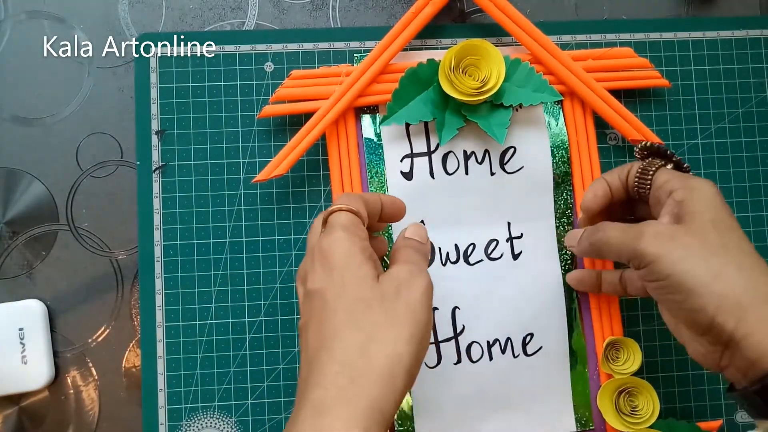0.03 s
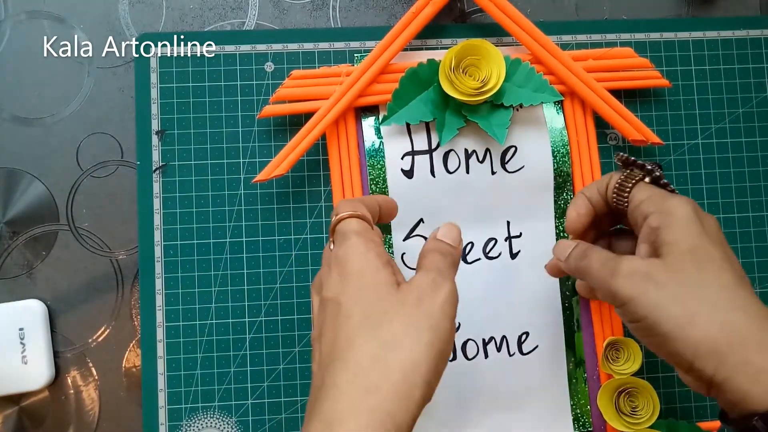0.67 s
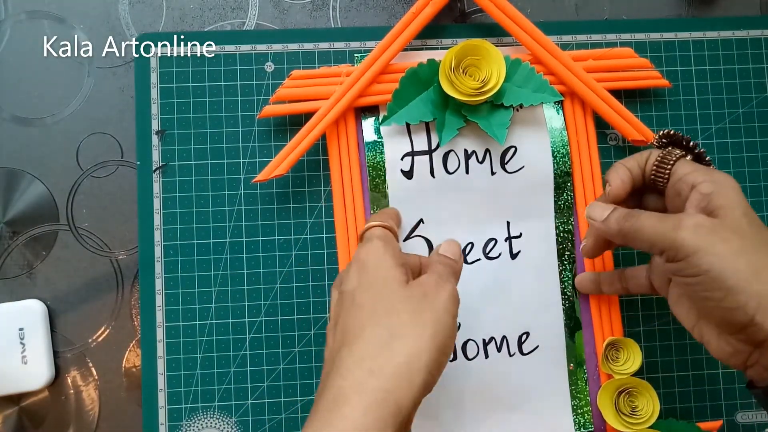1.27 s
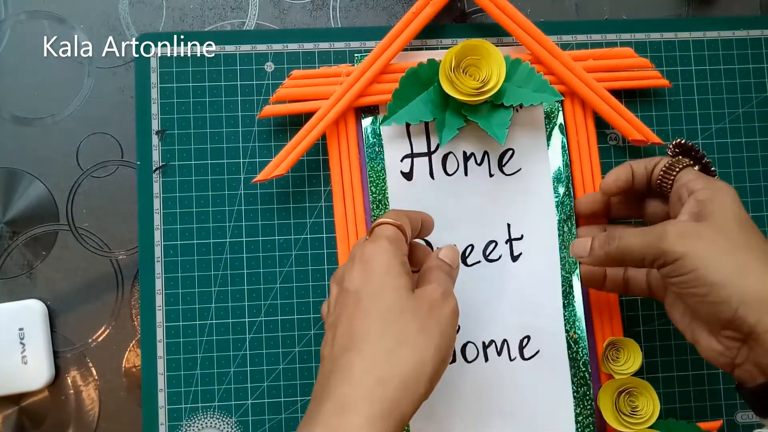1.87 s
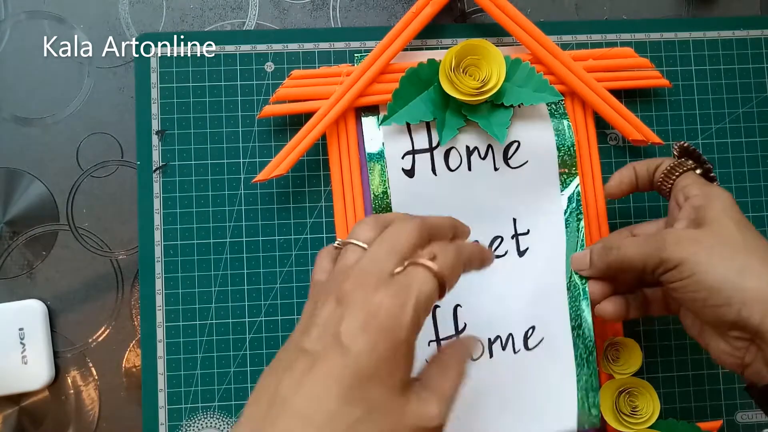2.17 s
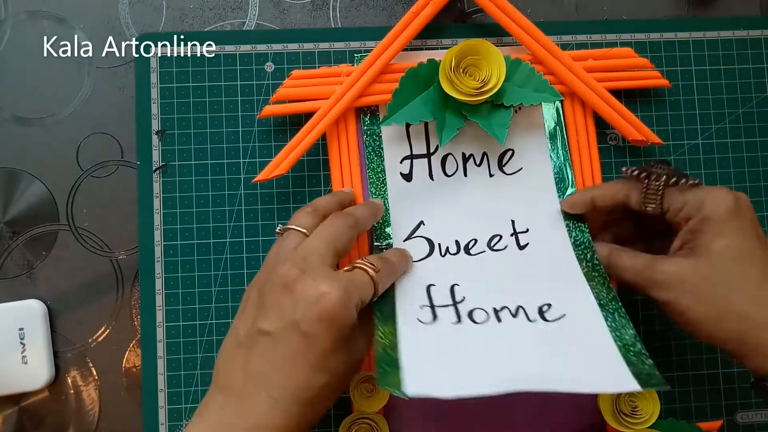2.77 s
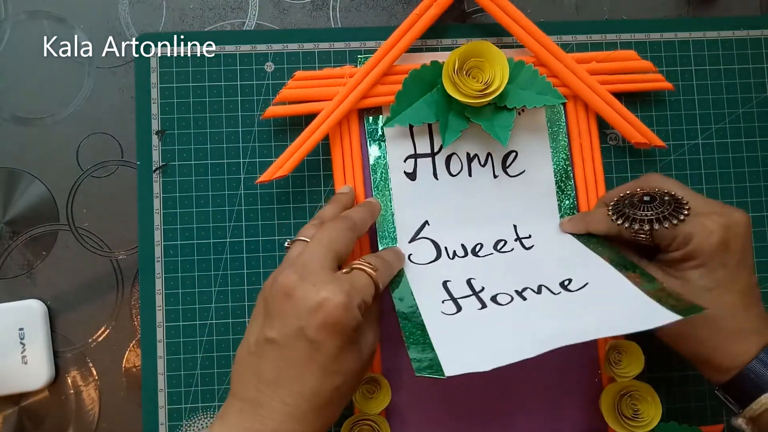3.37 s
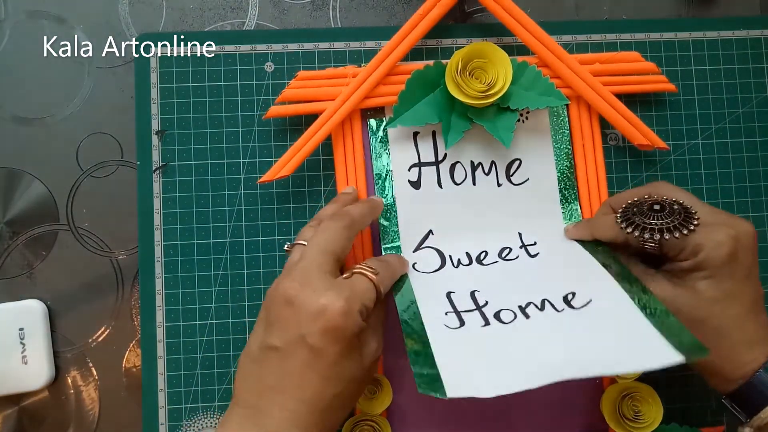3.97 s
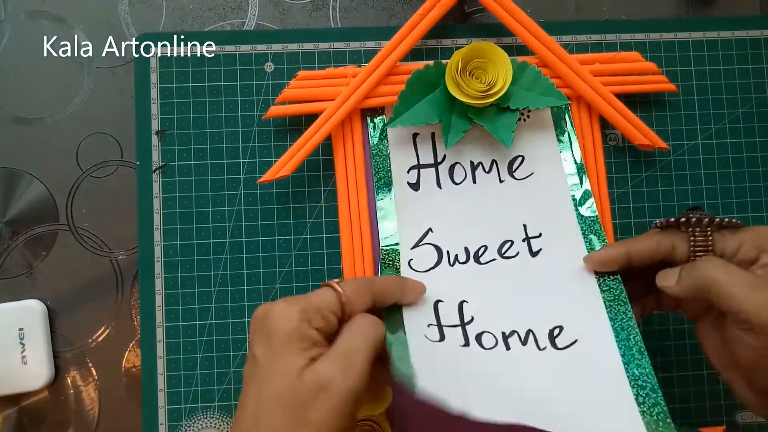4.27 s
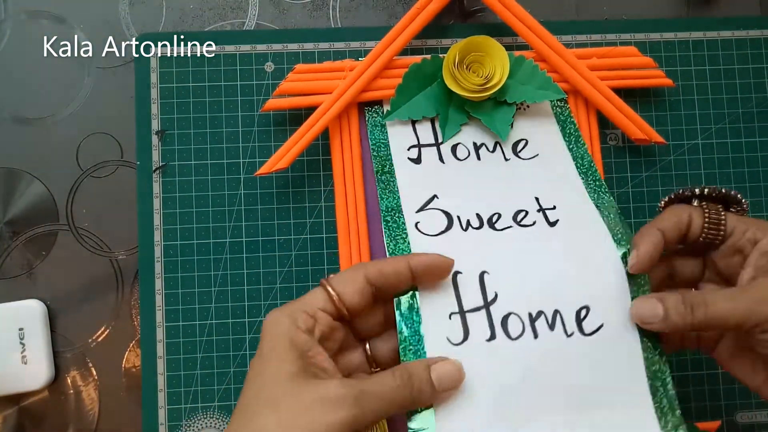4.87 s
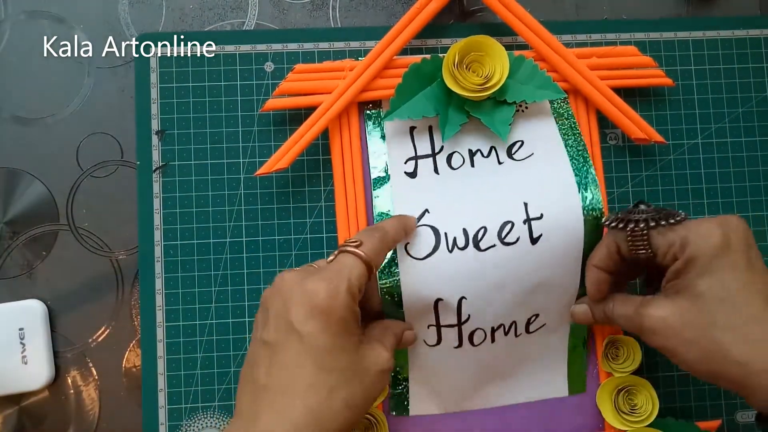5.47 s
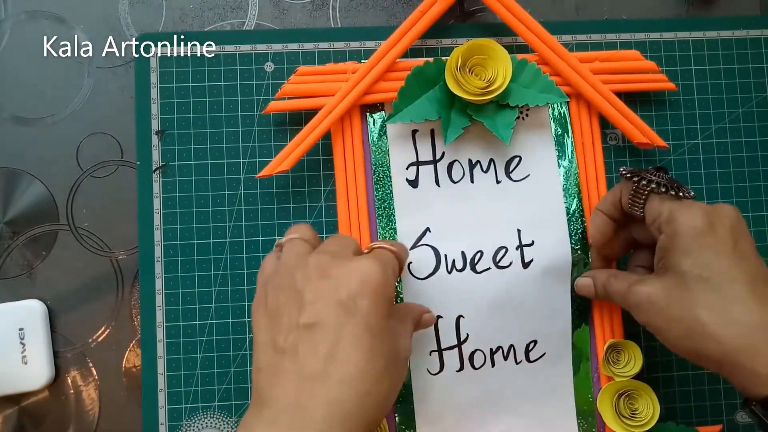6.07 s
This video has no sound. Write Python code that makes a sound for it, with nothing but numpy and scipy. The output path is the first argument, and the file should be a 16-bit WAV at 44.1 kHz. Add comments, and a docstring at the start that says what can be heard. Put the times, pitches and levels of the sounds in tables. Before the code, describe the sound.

A foil-backed card crinkles and snaps as it is worked into a paper frame, with soft, low bumps from the table.

```python
"""A foil-backed paper card snaps and crackles as two hands slide it into a paper frame, close by.
It snaps where it buckles, and crackles as its fibres catch and slip on the frame and fingers.
The hands lean on the craft table, which booms softly. A small, hard room answers every snap,
over quiet air and a faint whine."""
import sys
import numpy as np
from scipy import signal
from scipy.fft import rfft, irfft
from scipy.io import wavfile
from scipy.ndimage import uniform_filter1d, minimum_filter1d

SR = 44100
rng = np.random.default_rng(int(sys.argv[2]) if len(sys.argv) > 2 else 0)


def to_wav(sig):
    """Store sig (one row per channel, or 1-D mono) as 16-bit WAV at the path in sys.argv[1].

    Samples outside -1..1 are clipped; the rate is SR.
    """
    pcm = np.clip(np.atleast_2d(sig), -1, 1) * 32767
    pcm = np.round(pcm).astype(np.int16)
    wavfile.write(sys.argv[1], SR, pcm.T)  # frames by channels


N = 274346
TIME = np.arange(N) / SR

# Each time the card buckles (a larger patch has a lower lowest ring):
# time_s, level_db, crumple_s, lowest_ring_hz, strongest_ring_hz, brightness_db_per_octave
SNAPS = [(0.0341, -41.5, .0016, 1900, 1990, 0.5), (0.144, -32.5, 0.0083, 2170, 2020, -5.5),
         (0.1755, -20.5, 0.0014, 1900, 1870, -8), (0.187, -27.5, 0.0011, 2130, 3800, -2),
         (0.1904, -32, 0.0021, 2040, 2500, -14), (0.4441, -43.5, .0013, 1700, 1580, -4.5),
         (0.7045, -53, 0.0088, 2000, 3800, 5), (1.251, -40, 0.0018, 260, 2200, 16),
         (1.3583, -43, .0006, 5340, 6600, 4), (1.5655, -48, 0.0045, 1660, 2560, 3.5),
         (1.6934, -24, 0.00078, 1950, 3180, -2), (1.735, -18, 0.0021, 1700, 3700, 5),
         (2.047, -29, 0.011, 530, 3670, 7), (2.0538, -21, 0.014, 490, 4800, 7),
         (2.0825, -23.5, 0.0026, 435, 3200, -0.5), (2.0898, -32, 0.00028, 476, 3750, 14),
         (2.1788, -36, 0.0009, 580, 3300, 4), (2.2655, -48.5, .004, 440, 850, -18),
         (2.3542, -35.5, 0.0038, 556, 750, -22), (2.413, -32.5, 0.0044, 650, 2000, -3),
         (2.42, -32.5, 0.0033, 357, 2140, 8), (2.557, -35.5, 0.006, 485, 3320, 10),
         (2.7519, -42, 0.012, 260, 1630, -8.5), (3.216, -57, 0.003, 1110, 1900, -7.5),
         (3.3672, -52.5, 0.0004, 1300, 1920, -4), (3.4075, -31.5, .0021, 1390, 1750, 6.5),
         (3.5489, -36.5, 0.00069, 1660, 1940, -3.5), (3.5762, -36.5, 0.011, 700, 3450, -1),
         (3.6054, -46, .0008, 830, 1940, -12), (3.709, -39.5, .0007, 980, 2050, -10.5),
         (3.7751, -37.5, 0.0056, 1660, 1950, -24), (3.8842, -44.5, 0.02, 875, 1930, -22),
         (3.9371, -40, 0.00077, 377, 2060, -7.5), (3.9723, -35.5, .0033, 814, 1440, -9),
         (3.987, -36, 0.00058, 490, 2960, 5), (4.1746, -32, 0.0052, 463, 1250, -25),
         (4.2315, -37.5, 0.0086, 1710, 2730, 3), (4.327, -28, 0.0066, 510, 1090, -9.5),
         (4.394, -31, 0.001, 460, 533, -34), (4.4214, -28, 0.00068, 397, 2900, -6.5),
         (4.527, -25, 0.0049, 490, 3860, 7), (4.5374, -30.5, 0.0011, 456, 1400, -15.5),
         (4.668, -41, 0.002, 463, 1340, -13), (4.678, -31.5, 0.0032, 500, 1060, -17),
         (4.7613, -22.5, 0.0016, 322, 1140, -5.5), (4.7878, -21.5, 0.0054, 520, 726, -11),
         (4.8052, -21.5, 0.0036, 515, 2600, -9), (4.8239, -31, 0.0022, 444, 990, -7),
         (4.9461, -22.5, 0.0012, 494, 1232, -11), (4.993, -36, 0.0038, 410, 594, -17),
         (5.025, -42.5, .0045, 426, 575, -14), (5.1307, -23, 0.0025, 1120, 1380, -6.5),
         (5.143, -29.5, 0.0072, 328, 940, -3.5), (5.195, -31, 0.0068, 633, 1030, -24),
         (5.3014, -34, 0.0028, 804, 980, -24), (5.357, -33.5, 0.0066, 720, 1060, -3),
         (5.3628, -32.5, 0.0043, 815, 1120, -27), (5.4666, -37.5, 0.0034, 900, 1550, -5),
         (6.1456, -41.5, 0.0016, 1680, 1480, -6.5), (6.172, -29.5, 0.0013, 1270, 3860, -15.5),
         (6.1762, -25.5, 0.0035, 1030, 2770, -6.5), (6.2134, -33.5, 0.0047, 1700, 2780, -14)]


def snap(level_db, crumple_s, low_hz, ring_hz, bright_db, creases_per_s=4500, pop=0.34,
         ring_db=9.5, flutter=0.79, flutter_s=0.023, damping_hz=7000):
    """Tiny creases build to a pop and die away; the patch rings and ripples cross the card."""
    size, pop_at = 4096, 256  # samples
    t, hz = np.arange(size) / SR, np.fft.rfftfreq(size, 1 / SR)
    since_pop = t - pop_at / SR
    sizes = amp(6 * np.minimum(rng.exponential(1, size), 3)) * rng.choice([-1, 1], size)
    rise_and_fall = np.exp(np.minimum(since_pop / 0.65, -since_pop) / (0.99 * crumple_s))
    crumple = sizes * (rng.random(size) < creases_per_s / SR) * rise_and_fall
    crumple /= np.linalg.norm(crumple) + 1e-9
    crumple[pop_at] += pop * 0.0025 / crumple_s  # a short crumple is nearly all one pop
    ripples = rng.standard_normal((2, size)) * amp(-60 * t / flutter_s)
    ripples = left_and_right(*rfft(ripples / np.linalg.norm(ripples[0])), hz)
    lag_s = np.array([[0], [rng.normal(0.5, 1) * 0.00007]])  # each snap lies in a different spot
    paths = np.exp(-2j * np.pi * hz * lag_s) + flutter * ripples / np.hypot(1, hz / damping_hz)
    resonance = amp(ring_db / (1 + ((hz / ring_hz - 1) / 0.089) ** 2))
    sound = irfft(rfft(crumple) * paths * ringing(card_tone(hz, low_hz, bright_db) * resonance))
    # gives its start relative to the pop, and the sound with its level counted over 9 ms
    return since_pop[0], amp(level_db) * unit(sound) * np.sqrt(0.009 * SR / size)


def buckling():
    """The bending card gives way, one snap at a time."""
    out = np.zeros((2, N))
    for time_s, *settings in SNAPS:
        offset_s, sound = snap(*settings)
        add(out, time_s + offset_s, sound)
    return out


def card_tone(hz, low_hz, bright_db):
    """A patch of card gives out little below its lowest ring; quick foil slips lift the treble."""
    # The card's own tone: pitch_hz, level_db
    tone = [(150, -25.5), (290, 1.5), (450, -1), (680, -6.5), (1000, -2.5), (1560, -1.5), (2000, -2.5),
            (3750, -1), (4420, -3.5), (5200, -13), (6600, -12), (8400, -19.5), (12000, -32), (14500, -33)]
    below = (low_hz / (hz + 1)) ** 2
    bass_cut = np.sqrt(1 / (1 + below ** 4) + 0.0045 / (1 + below))
    treble_octaves = np.log2(np.hypot(1, np.minimum(hz, 8000) / 2000))
    return bass_cut * amp(look_up(tone, hz) + bright_db * treble_octaves)


def hand_movement(held_db=-71.5, held_low_hz=1730, held_bright_db=8.5,
                  creak_db=-27, creak_s=0.036, settle_s=0.0033):
    """Level, lowest ring and brightness of the rubbing over time; louder moves shape the tone more."""
    # The card rubs on frame and fingers:
    # start_s, length_s, level_db, swell_db, lowest_ring_hz, brightness_db_per_octave
    strokes = [(0.043, 0.027, -51.5, -7, 1720, -2), (0.091, 0.11, -50.5, -9, 1740, -7),
               (0.178, 0.034, -36, -8, 505, 0.5), (0.27, 0.24, -54.5, 3.5, 1660, -2.5),
               (0.666, 0.058, -53, 19, 1670, 2.5), (0.79, 0.019, -67, 31, 1720, -22),
               (0.944, 0.14, -51.5, -16, 2010, 6), (1.061, 0.12, -47.5, 2.5, 1990, 1),
               (1.209, 0.075, -52, -4, 1430, -2), (1.443, 0.12, -54.5, 8.5, 1940, 3),
               (1.718, 0.081, -39.5, -11, 490, -1), (1.805, 0.19, -49.5, 2, 434, 6.5),
               (1.916, .065, -40.5, -9, 1620, 0.5), (1.988, 0.12, -38, 17.5, 567, 2.5),
               (2.121, 0.15, -48, -29, 527, -1.5), (2.388, 0.082, -41.5, -7, 333, -4),
               (2.484, 0.067, -48, 15, 385, 4.5), (2.552, 0.15, -41.5, -12, 460, 2),
               (2.69, 0.22, -51, -12.5, 303, 0.5), (3.218, 0.11, -58, 2, 1460, 3.5),
               (3.376, 0.036, -50.5, 10, 1410, -5.5), (3.397, 0.076, -48.5, -7.5, 450, -18),
               (3.525, 0.09, -46, 8, 830, -0.5), (3.621, 0.065, -40, -3.5, 970, -1.5),
               (3.747, 0.062, -54, 13.5, 1170, -1.5), (3.898, 0.265, -43, 4, 420, -1.5),
               (4.188, 0.094, -39.5, -5.5, 520, -2), (4.276, 0.24, -44.5, 10, 407, 0),
               (4.498, 0.12, -36.5, -2, 386, 4), (4.617, 0.14, -45.5, -4, 430, 1.5),
               (4.78, 0.096, -45.5, 3, 390, -5), (4.865, .14, -46.5, 1.5, 444, 4.5),
               (4.998, 0.18, -48.5, -16, 458, 6), (5.135, 0.16, -42.5, -3, 435, -0.5),
               (5.276, 0.16, -38, -5, 717, 2.5), (5.425, 0.18, -39.5, -3.5, 755, 0.5),
               (5.595, 0.2, -46, -13.5, 1040, -2), (5.781, 0.11, -39, 13, 1140, -2.5),
               (6.167, 0.056, -39.5, 21, 600, 5)]
    # the foil creeps faintly even while the card is just held
    sums = np.outer([1, held_low_hz, held_bright_db], np.full(N, amp(2 * held_db)))
    for start_s, length_s, level_db, swell_db, low_hz, bright_db in strokes:
        swell = swell_db * (np.clip((TIME - start_s) / length_s, 0, 1) - 0.5)
        push = gesture(start_s, length_s, rise_s=0.19 * length_s, fade_s=0.011)
        sums += np.outer([1, low_hz, bright_db], (amp(level_db + swell) * push) ** 2)
    # the card creaks just before each snap and settles after it
    since_snap = TIME[:SR // 8] - 0.03
    creak = np.exp(np.minimum(since_snap / creak_s, -since_snap / settle_s))
    for time_s, level_db, _, low_hz, _, bright_db in SNAPS:
        power = (amp(level_db + creak_db) * creak) ** 2
        add(sums, time_s + since_snap[0], np.outer([1, low_hz, bright_db], power))
    power, low_sum, bright_sum = sums
    return 10 * np.log10(power), low_sum / power, bright_sum / power


def rubbing(level_db, low_hz, bright_db, slips_per_s=3000, spurt_hz=45,
            crinkles_per_s=28, crinkle_db=20, hollow_db=6, wander_db=3):
    """Fibres catch and slip in spurts of fine crackle; the rubbed patch rings hollow at two pitches."""
    sizes = amp(1.5 * np.minimum(rng.exponential(1, (2, N)), 5)) * rng.choice([-1, 1], (2, N))
    slips = unit(sizes * (rng.random((2, N)) < slips_per_s / SR))
    slips += rng.standard_normal((2, N))  # hiss
    crinkles = amp(crinkle_db) * np.clip(rng.standard_normal((2, N)), -2, 2)
    slips += crinkles * (rng.random(N) < crinkles_per_s / SR)  # now and then a small crease gives way
    spurts_db = unit(filtered(rng.standard_normal(N),
                              lambda hz: hz / (spurt_hz ** 2 + hz ** 2) / (1 + hz / (10 * spurt_hz))))
    hz, t, bands = signal.stft(unit(slips * amp(spurts_db)), SR, nperseg=512, noverlap=384)
    hz = hz[:, None]
    low_hz, bright_db = np.interp(t, TIME, low_hz), np.interp(t, TIME, bright_db)
    hollow = sum(1 / (1 + ((hz / (ratio * low_hz) - 1) / 0.035) ** 2) for ratio in (1.148, 2.0))
    # the ringing wanders as the card bends
    wander = uniform_filter1d(rng.standard_normal(bands.shape[1:]), size=3, axis=0)
    wander = unit(uniform_filter1d(wander, size=14, axis=1))
    gain = card_tone(hz, low_hz, bright_db) * amp(hollow_db * hollow + wander_db * wander)
    gain /= np.sqrt(np.mean(gain ** 2, axis=0))
    sound = signal.istft(left_and_right(*bands, hz) * gain, SR, nperseg=512, noverlap=384)[1]
    return sound[:, :N] * amp(level_db - 1.5)


def crease_ticks(rub_db, low_hz, bright_db, count=80, spread_db=1.5):
    """Small creases tick at random moments, about as loud as the rubbing is just then."""
    out = np.zeros((2, N))
    for when, size, pitch in rng.random((count, 3)):
        at = int(when * N)
        level_db = rub_db[at] - 1 + spread_db * (2 * size - 1)
        offset_s, sound = snap(level_db, crumple_s=0.00032, low_hz=low_hz[at],
                               ring_hz=2000 * 2 ** (pitch - 0.5), bright_db=bright_db[at] - 3)
        add(out, at / SR + offset_s, sound)
    return out


def table_boom(resting_db=-69):
    """The fumbling hands shake the table top, which booms at its own low pitches."""
    # Where the table top rings: pitch_hz, width_hz, level_db
    rings = [(30, 33, -34), (63.5, 8.7, -15), (86, 48, -12), (119.5, 3.6, 6.5), (146.8, 34, -4.5),
             (196.2, 20, -9)]
    # The hands lean on the table: start_s, length_s, level_db
    leans = [(0.023, .08, -48.5), (0.445, 0.041, -59), (1.075, 0.13, -56.5), (1.243, 0.067, -45),
             (1.307, 0.14, -54.5), (1.658, 0.06, -59), (1.753, 0.076, -54), (2.04, 0.13, -49),
             (2.278, 0.54, -56.5), (2.916, 0.095, -52.5), (3.255, 0.37, -61.5), (3.572, 0.081, -54.5),
             (3.75, 0.066, -61.5), (3.9, 0.055, -57), (4.11, 0.036, -57.5), (4.454, 0.1, -53.5),
             (4.753, 0.16, -51), (4.975, 0.051, -57), (5.168, 0.035, -59.5), (5.384, .13, -60)]

    def table_tone(hz):
        return np.sqrt(sum(amp(2 * db) / (1 + (2 * (hz - pitch_hz) / width_hz) ** 2) ** 1.39
                           for pitch_hz, width_hz, db in rings))
    boom, right_only = filtered(rng.standard_normal((2, N)), table_tone)
    boom /= np.sqrt(uniform_filter1d(boom ** 2, size=3000) + 1e-12)  # even out the loudness
    power = amp(2 * resting_db)
    for start_s, length_s, level_db in leans:
        power += (amp(level_db) * gesture(start_s, length_s, rise_s=0.018, fade_s=0.026)) ** 2
    return np.array([boom, boom + 0.95 * unit(right_only)]) * np.sqrt(power)


def hand_thuds(bass_hz=62, top_hz=150, rise_s=0.014):
    """A hand lands softly but heavily on the frame and gives one short, deep push."""
    # Each landing: start_s, level_db
    landings = [(1.26, -60), (4.78, -52)]

    def thud_tone(hz):
        return hz ** 2 / (bass_hz ** 2 + hz ** 2) ** 2 * np.exp(-(hz / top_hz) ** 2)
    out, t = np.zeros((2, N)), TIME[:SR // 4]
    push = t / rise_s * np.exp(1 - t / rise_s)
    for start_s, level_db in landings:
        rumble = unit(filtered(rng.standard_normal(len(t)), thud_tone))
        add(out, start_s, (amp(level_db) * rumble * push)[None])
    return out


def room_echo(sound, tail_db=-9, first_echo_s=0.008, build_s=0.0018):
    """A few echoes bounce off the table and near walls, then blur into a fading tail."""
    # Time the tail takes to fall by 60 dB: pitch_hz, fade_s
    fade_times = [(150, 0.64), (500, 0.34), (1400, 0.49), (3700, 0.42), (9000, 0.43), (15000, 0.18)]
    # Tone of the tail: pitch_hz, level_db
    wall_tone = [(150, 14), (500, 5.5), (1400, 2.5), (3700, 4.5), (7000, 1.5), (14000, 6)]
    # Pitches that standing waves in the room boost or weaken: pitch_hz, gain_db
    room_notes = [(461, 14), (553, 17.5), (729, 4), (779, 14), (988, 16), (1436, -21), (1524, 8.5)]
    hz, t, bands = signal.stft(rng.standard_normal((2, SR)), SR, nperseg=256)
    alike = (0.28 / (1 + (hz / 1500) ** 2))[:, None]  # left and right agree a little in the bass
    bands[1] = alike * bands[0] + np.sqrt(1 - alike ** 2) * bands[1]
    wash = signal.istft(bands, SR, nperseg=256)[1][:, :SR]
    wash = filtered(wash, lambda f: amp(sum(db / (1 + ((f - note_hz) / 7) ** 2)
                                            for note_hz, db in room_notes)))
    fade = amp(look_up(wall_tone, hz)[:, None] - 60 * t / look_up(fade_times, hz)[:, None])
    bands = signal.stft(wash, SR, nperseg=256)[2] * fade
    tail = signal.istft(bands, SR, nperseg=256)[1][:, :SR]
    tail *= np.clip((TIME[:SR] - first_echo_s) / build_s, 0, 1)
    tail *= amp(tail_db) / np.linalg.norm(tail[0])
    for delay_s in np.geomspace(first_echo_s, 0.025, num=8) * rng.uniform(0.9, 1.1, size=8):
        at = int(delay_s * SR) + rng.integers(-3, 4, size=2)  # reaches left and right a little apart
        tail[[0, 1], at] += rng.choice([-1, 1]) * amp(-11) * first_echo_s / delay_s / 2
    return signal.fftconvolve(sound, tail, axes=1)[:, :N]


def room_air(air_db=-71, whine_db=-84, whine_hz=4400, whine_width_hz=60):
    """Still room air with a thin, faint whine."""
    # Tone of the quiet room: pitch_hz, level_db
    air_tone = [(20, 0), (45, -8), (105, -6), (220, 0), (550, -7), (1000, -6), (2000, -39.5), (4000, -58),
                (7000, -38.5), (14000, -59.5)]
    air = filtered(rng.standard_normal((2, N)), lambda hz: amp(look_up(air_tone, hz)))
    whine = filtered(rng.standard_normal((2, N)),
                     lambda hz: 1 / (1 + ((hz - whine_hz) / whine_width_hz) ** 2))
    return amp(air_db) * unit(air) + amp(whine_db) * unit(whine)


def gesture(start_s, length_s, rise_s, fade_s):
    """A movement of the hand gets going, holds and dies away."""
    since = TIME - start_s
    return np.clip(since / rise_s, 0, 1) * np.exp(-np.clip((since - length_s) / fade_s, 0, 20))


def left_and_right(left, other, hz):
    """Blends two unrelated spectra into a left and right that are most alike in the bass."""
    # How alike the card sounds on both sides: pitch_hz, likeness_0_to_1
    likeness = [(100, 0.7), (1300, 0.64), (3000, 0.14), (6000, 0), (15000, 0.3)]
    alike = np.clip(look_up(likeness, hz), 0, 1)
    return np.array([left, alike * left + np.sqrt(1 - alike ** 2) * other])


def ringing(gain):
    """Turns a tone curve into the spectrum of a sound that starts sharply, then rings."""
    log_gain = np.log(np.maximum(gain, gain.max() * 1e-5))
    phase = -signal.hilbert(np.r_[log_gain, log_gain[-2:0:-1]]).imag
    return gain * np.exp(1j * phase[:len(gain)])


def amp(db):
    """Turns decibels into a multiplier."""
    return 10 ** (np.asarray(db) / 20)


def unit(sound):
    """Scales a sound to an average (rms) level of one."""
    return sound / np.sqrt(np.mean(sound ** 2) + 1e-20)


def look_up(points, hz):
    """Reads between a table's rows along a musical (log) pitch scale."""
    pitches, values = np.transpose(points)
    return np.interp(np.log(hz + 1), np.log(pitches + 1), values)


def filtered(sound, gain):
    """Turns each frequency up or down by gain(hz)."""
    size = sound.shape[-1]
    return irfft(rfft(sound) * gain(np.fft.rfftfreq(size, 1 / SR)), size)


def add(mix, start_s, sound):
    """Mixes a sound in at the given time."""
    part = mix[:, max(round(start_s * SR), 0):][:, :sound.shape[1]]
    part += sound[:, :part.shape[1]]


def scene():
    """Card and table in the room; the card's back sends its own version of each snap to the walls."""
    movement = hand_movement()
    crackle = rubbing(*movement) + crease_ticks(*movement)
    front, back = buckling() + crackle, buckling() + crackle
    echoes = (room_echo(front[:1]) + room_echo(back[1:])) / np.sqrt(2)
    return front + echoes + table_boom() + hand_thuds() + room_air()


def record(dry, peak_limit=0.39, top_hz=16100):
    """The microphone favours the left at most pitches, softens tall peaks and cuts the top treble."""
    # How much louder the left is than the right: pitch_hz, level_db
    balance = [(60, 9.5), (400, 5), (1300, 6.5), (4400, 8.5), (6000, 9), (8200, -4.5), (10000, -5.5),
               (12500, 6)]

    def side_gains(hz):
        ratio = amp(look_up(balance, hz))
        return np.array([ratio, np.ones_like(ratio)]) * np.sqrt(2 / (1 + ratio ** 2))
    heard = filtered(np.pad(dry, ((0, 0), (0, SR))), side_gains)
    safe_gain = peak_limit / np.maximum(abs(heard).max(0), peak_limit)
    heard *= uniform_filter1d(minimum_filter1d(safe_gain, size=90), size=90)  # dips last a few ms
    treble_cut = signal.firwin(301, top_hz, window=("kaiser", 9), fs=SR)
    return signal.oaconvolve(heard, treble_cut[None], "same", axes=1)[:, :N]


dry = scene()
out = record(dry)
to_wav(out)
```